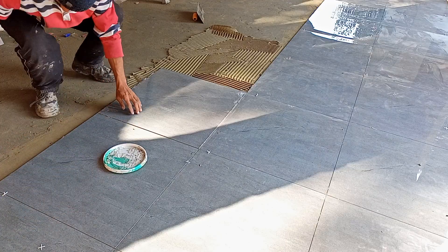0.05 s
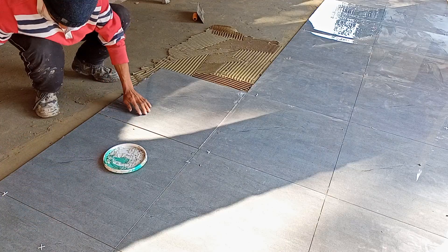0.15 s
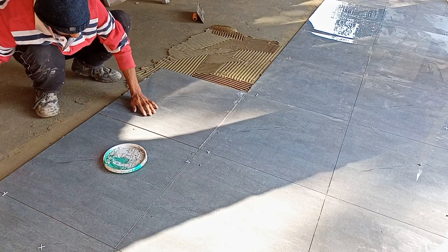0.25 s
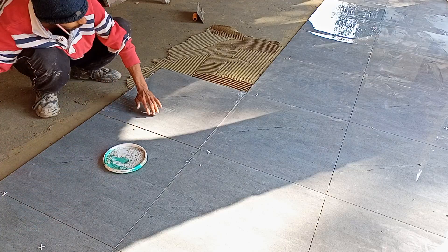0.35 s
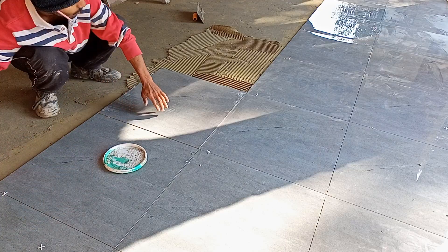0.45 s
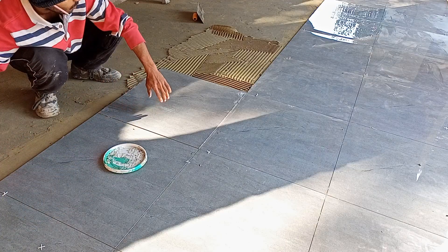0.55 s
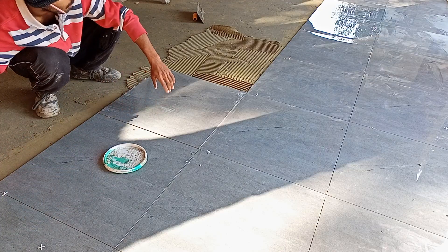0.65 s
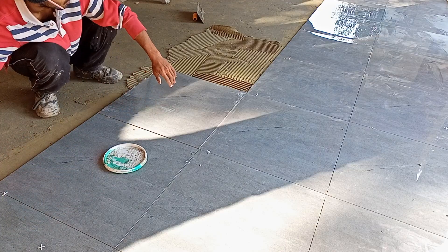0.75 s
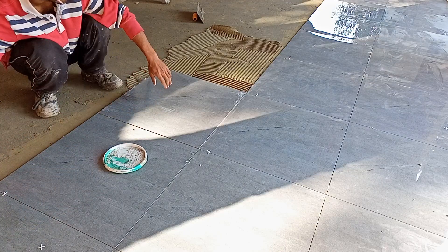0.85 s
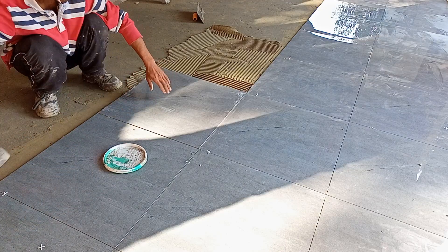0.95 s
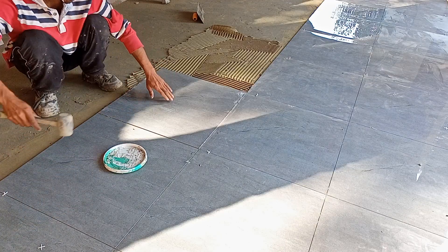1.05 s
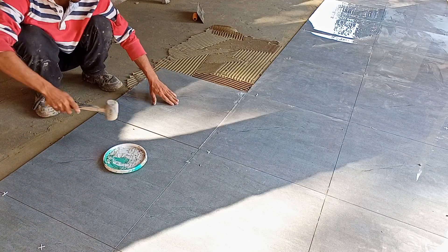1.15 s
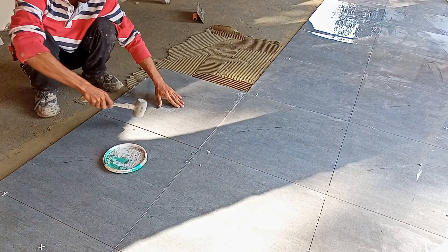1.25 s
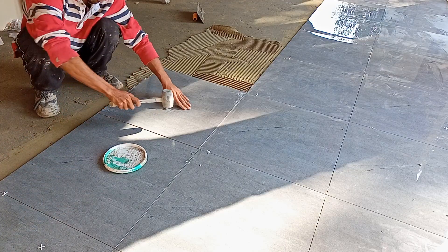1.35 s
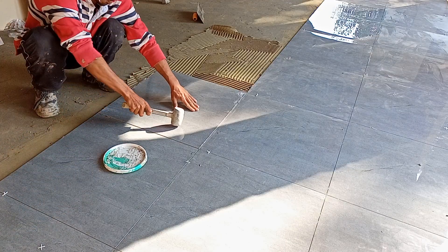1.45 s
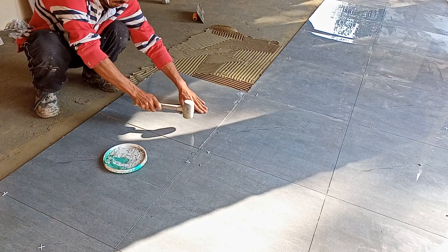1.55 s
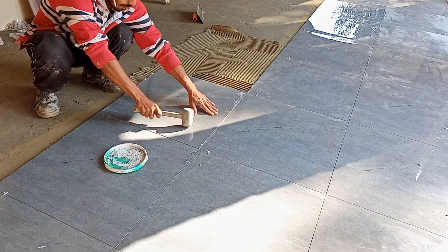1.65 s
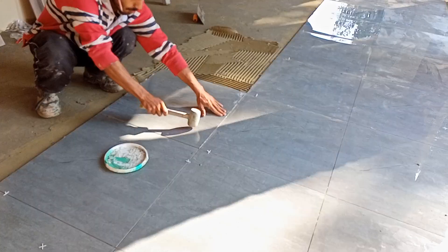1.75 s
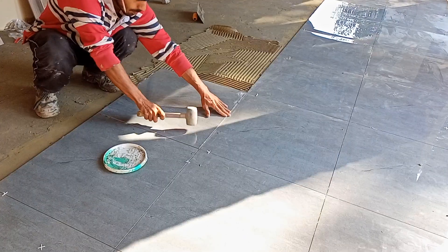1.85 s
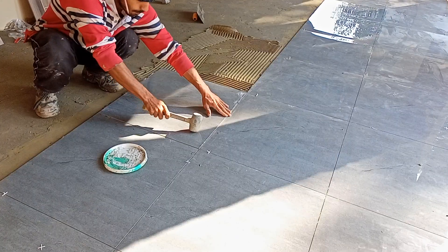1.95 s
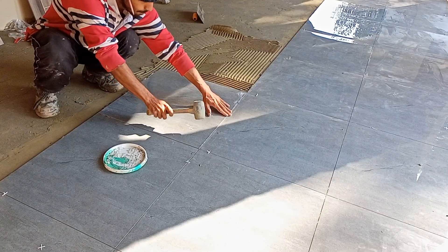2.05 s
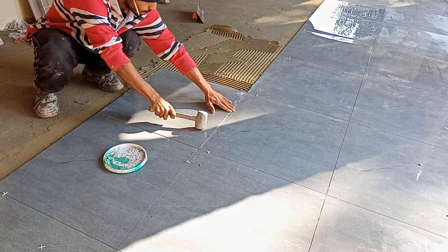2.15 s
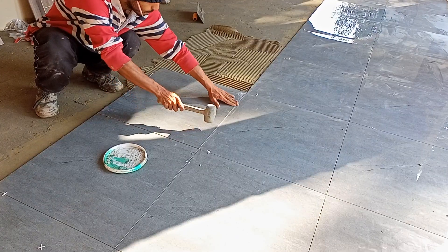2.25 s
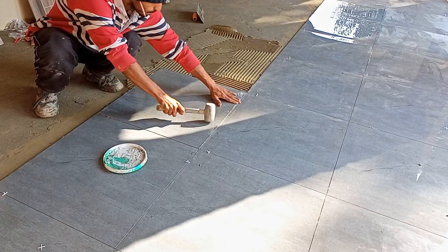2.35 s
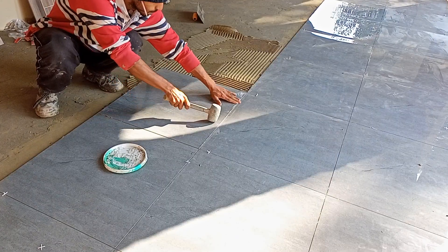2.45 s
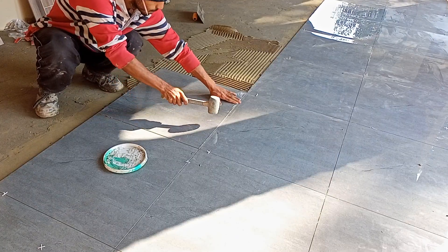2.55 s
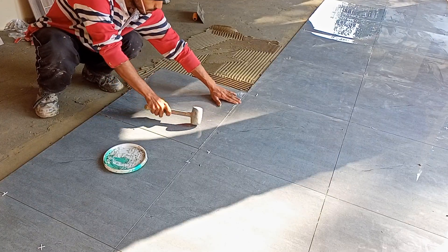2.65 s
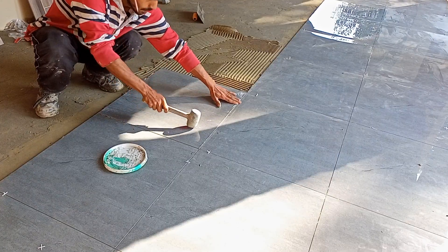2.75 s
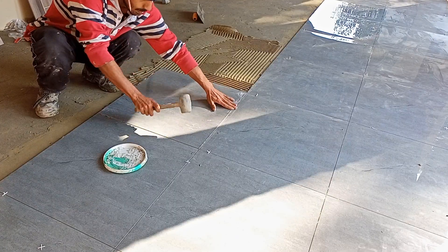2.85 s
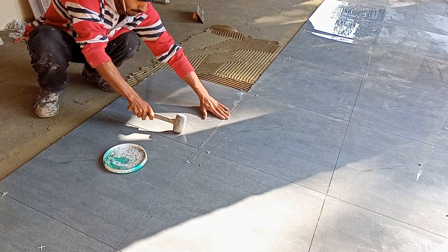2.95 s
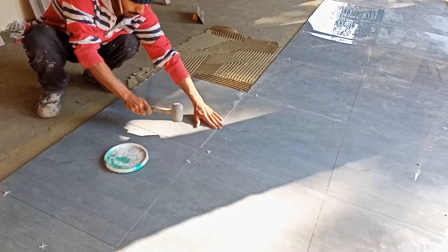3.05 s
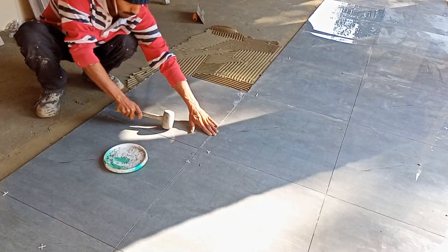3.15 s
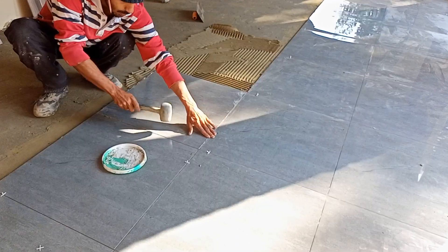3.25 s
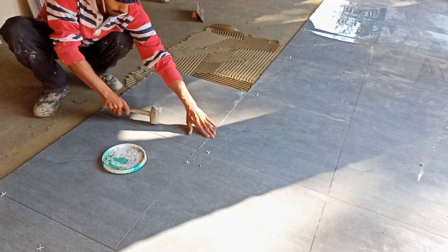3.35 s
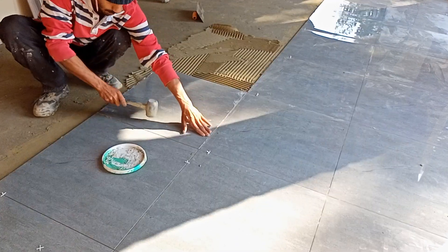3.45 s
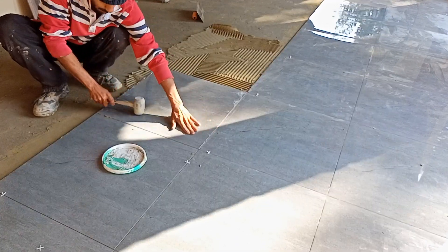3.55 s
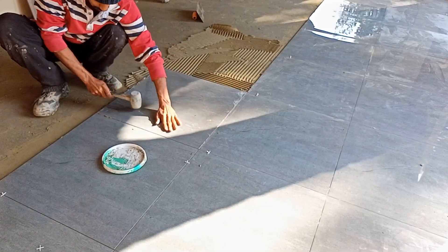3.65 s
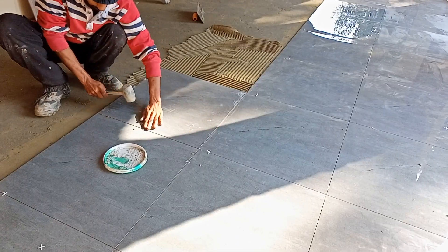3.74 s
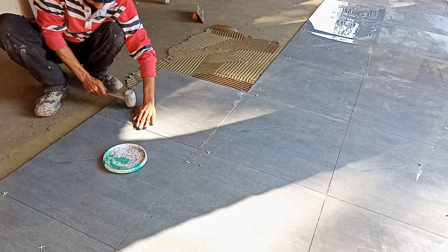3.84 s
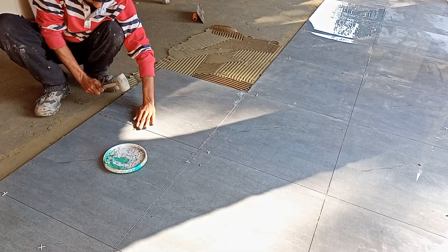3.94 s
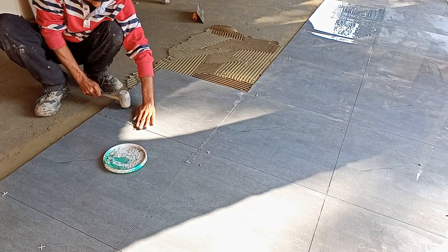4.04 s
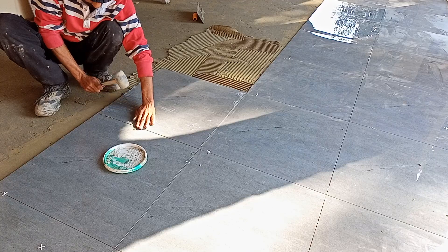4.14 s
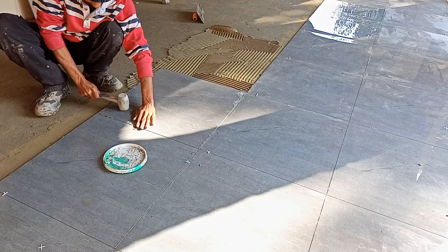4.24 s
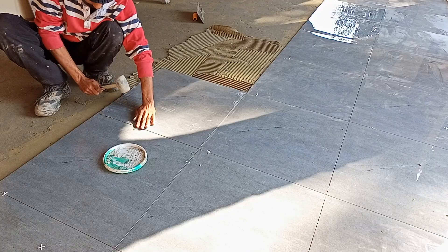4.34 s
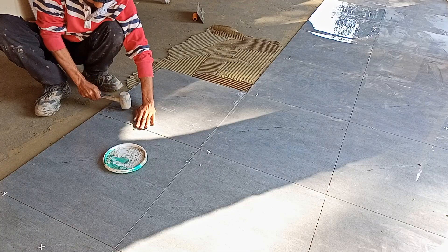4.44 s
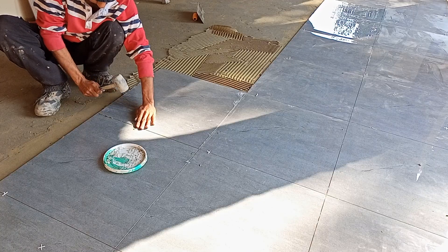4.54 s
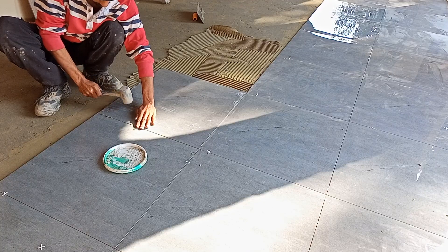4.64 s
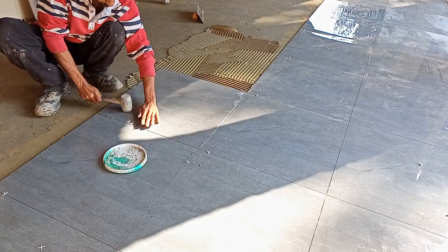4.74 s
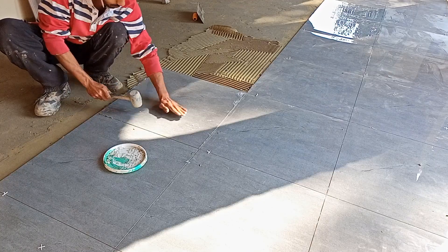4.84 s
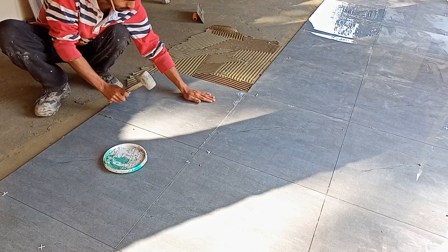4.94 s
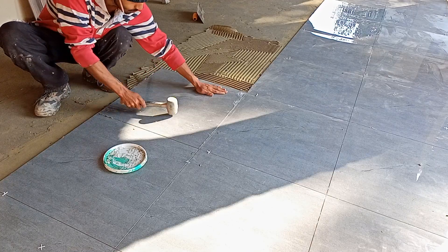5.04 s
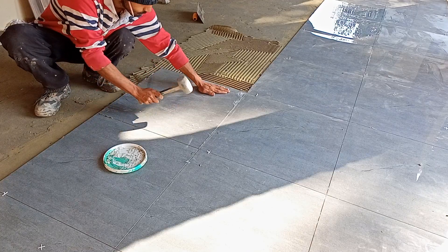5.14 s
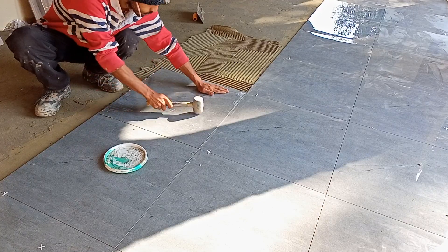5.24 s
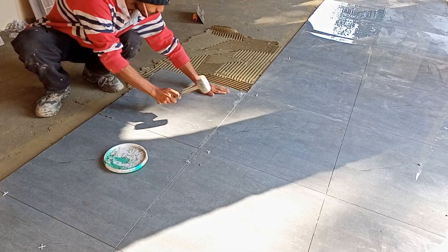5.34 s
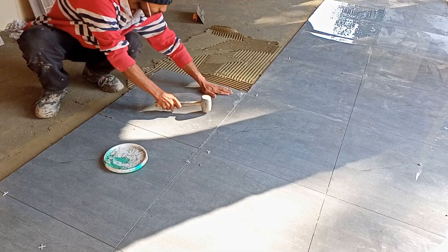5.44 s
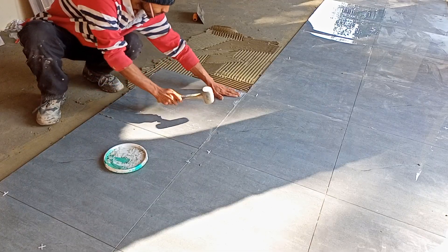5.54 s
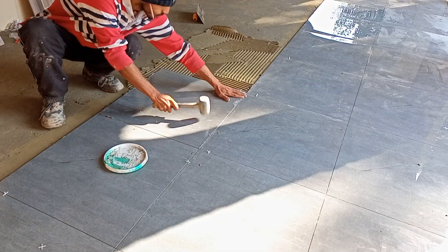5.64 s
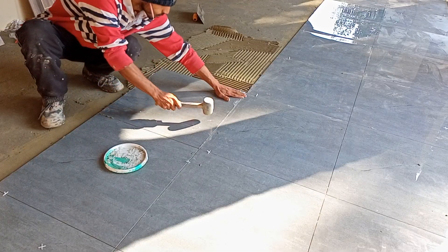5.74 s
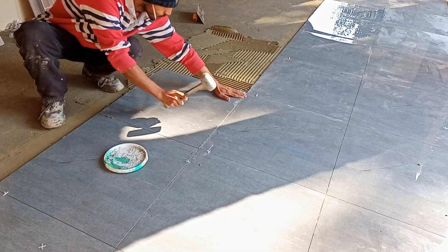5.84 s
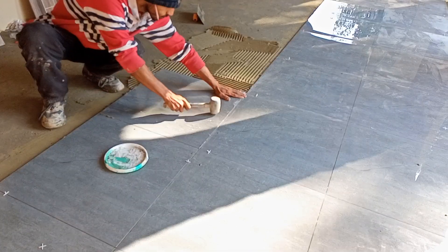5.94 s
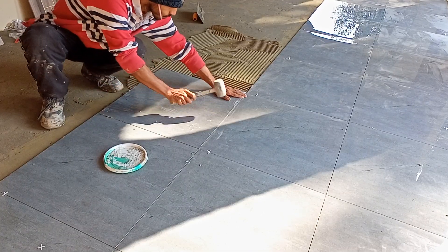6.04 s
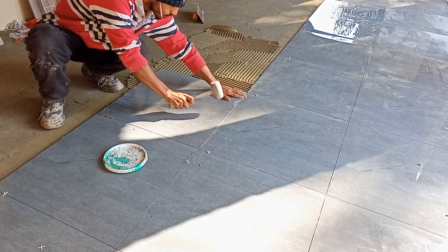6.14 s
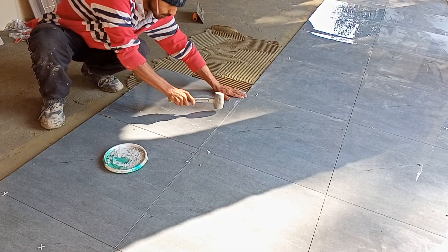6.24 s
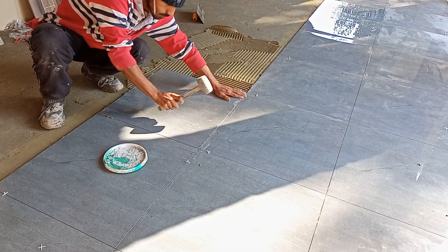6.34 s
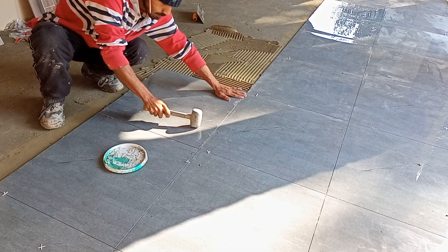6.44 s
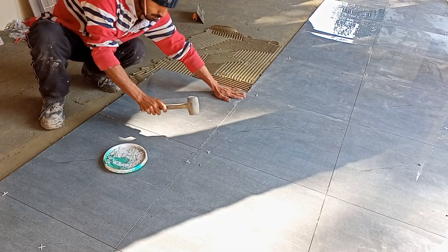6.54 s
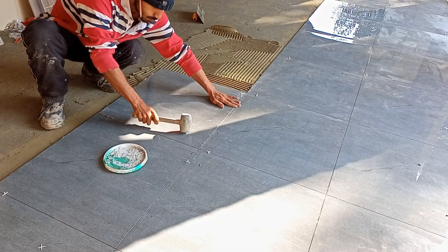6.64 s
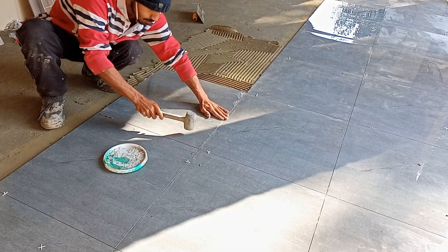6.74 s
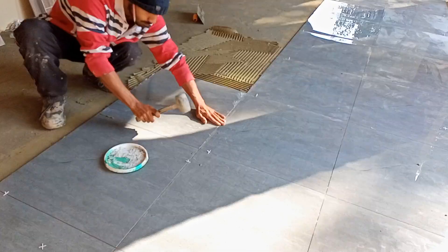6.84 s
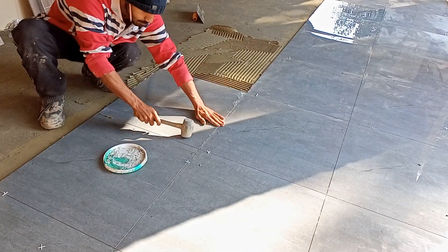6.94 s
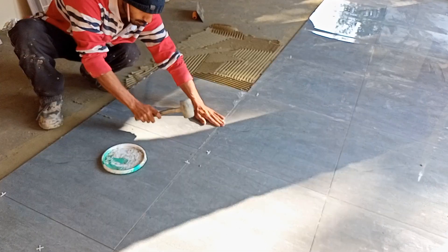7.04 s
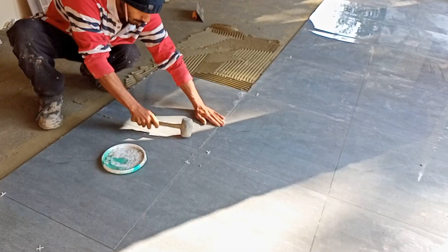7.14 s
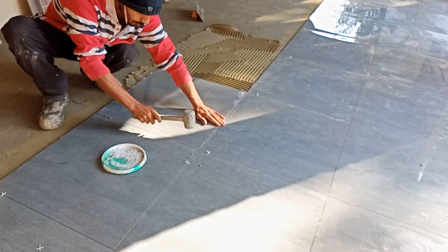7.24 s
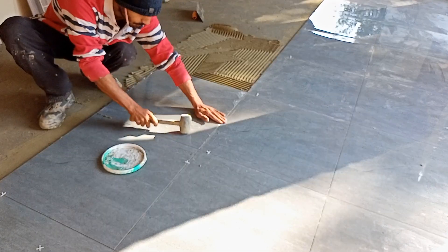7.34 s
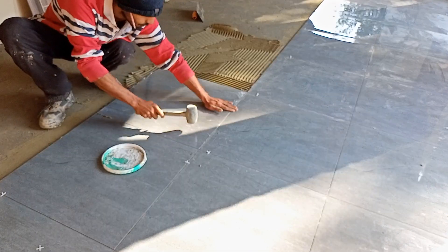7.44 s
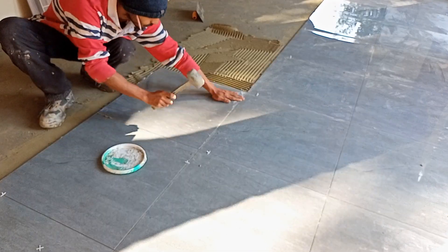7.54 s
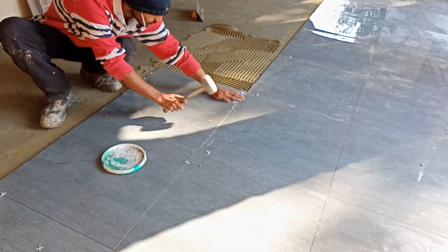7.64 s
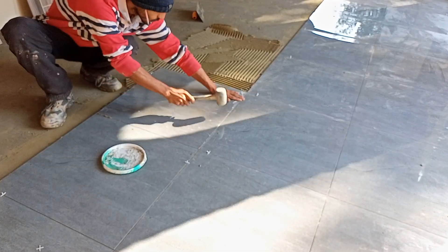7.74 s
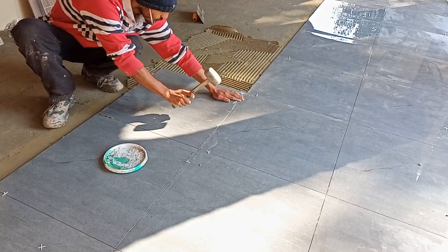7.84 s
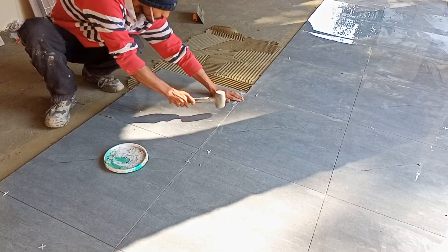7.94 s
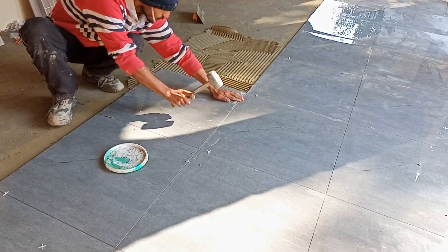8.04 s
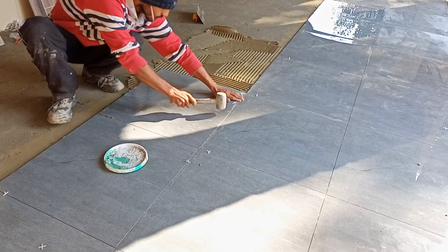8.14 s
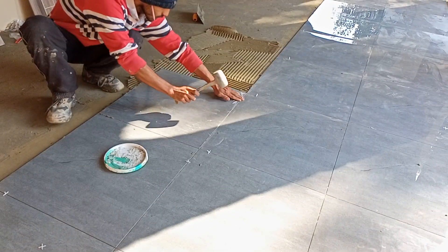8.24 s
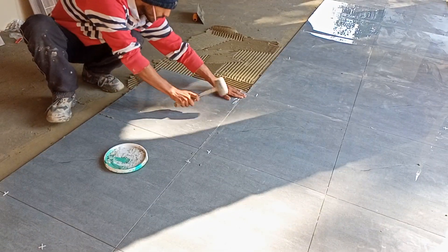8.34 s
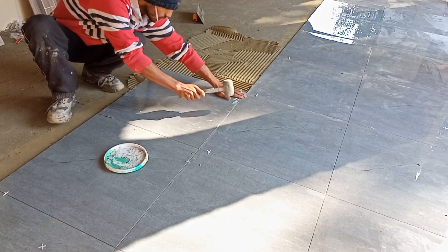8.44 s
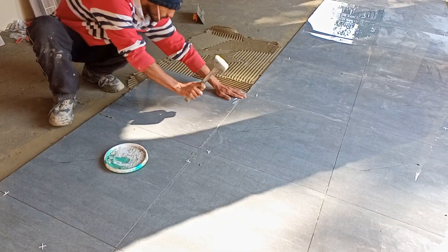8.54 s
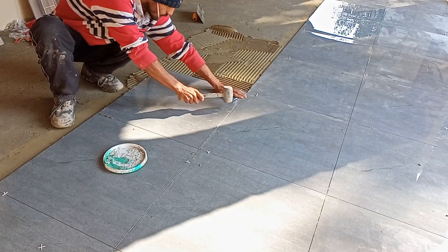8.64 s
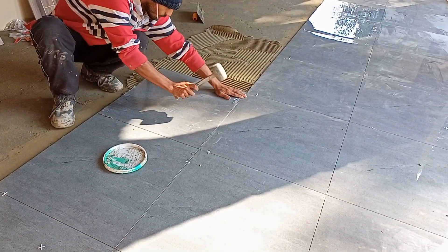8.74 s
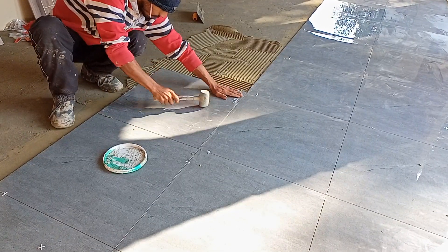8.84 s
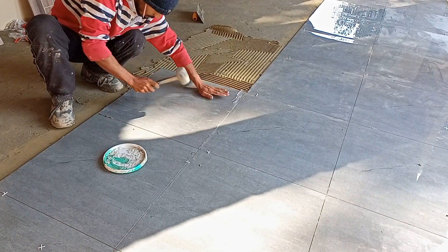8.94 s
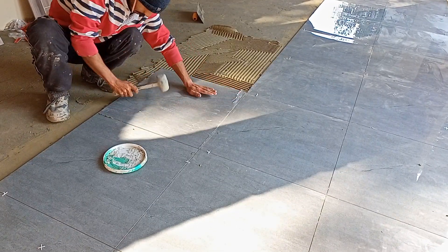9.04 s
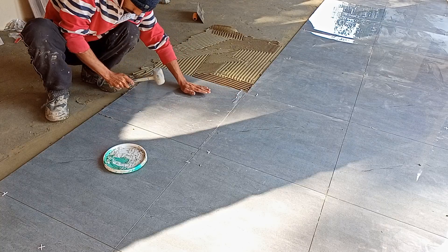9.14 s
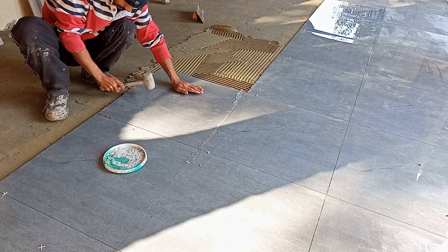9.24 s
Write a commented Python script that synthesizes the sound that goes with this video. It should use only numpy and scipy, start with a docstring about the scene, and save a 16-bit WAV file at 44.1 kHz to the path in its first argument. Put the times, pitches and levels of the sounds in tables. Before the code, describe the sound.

A bare concrete room on a building site, with a barely audible steady rumble. From 0 to 1.3 seconds there are quiet handling sounds: a short gritty scuff at the start, soft finger pats on a tile near 0.2, 0.7 and 1.2, and small dry rubs between them. At 1.55 a rubber mallet begins striking the large tile, about every 0.2 to 0.3 seconds, continuing to the last blow near 9.2. Early blows are low, solid thuds; from about 3.9 to 4.9 they become hollow, woody clacks, slightly faster and stronger. Around 5.1 to 5.5 come forceful blows, then thuds and clacks alternate, softer near 7.4, with hollow knocks again around 7.8 to 8.7. Each has a brief rubbery slap and a half-second room tail. The level is squeezed: sound ducks just before each hit and the reverberation swells back afterward.

```python
"""A bare concrete room on a building site: a tiler pats a large floor tile amid gritty scuffs, then beds
it into its adhesive with quick blows of a rubber mallet. Each blow is a filtered slap plus a knock of
decaying noise through the tile's resonances: bedded spots thud, hollow ones clack. Shaped noise makes the
scuffs, pats, site rumble and room tail. The recorder's limiter ducks just before each blow and lets the
reverberation swell back after it."""
import sys
import numpy as np
from scipy import signal
from scipy.fft import rfft, irfft, next_fast_len
from scipy.io import wavfile
from scipy.ndimage import uniform_filter1d, minimum_filter1d, map_coordinates

SR = 44100
rng = np.random.default_rng(int(sys.argv[2]) if len(sys.argv) > 2 else 0)


def put_to_file(sound):
    """Save the sound as 16-bit audio at rate SR, in the file named by the first command-line argument."""
    columns = np.atleast_2d(sound).T  # one column per channel
    safe = np.clip(columns, -1, 1)
    whole_steps = np.round(safe * 32767)
    wavfile.write(sys.argv[1], SR, whole_steps.astype(np.int16))


N = 409688


def amp(db):
    """Decibels to gain."""
    return 10 ** (np.asarray(db) / 20)


def unit(x):
    """Scale to rms 1."""
    return x / np.sqrt(np.mean(x ** 2) + 1e-20)


def along(points, hz):
    """A (frequency, value) curve read on a log-frequency axis."""
    point_hz, value = np.transpose(points)
    return np.interp(np.log(hz + 1), np.log(point_hz + 1), value)


def at(curve, s):
    """A (time, value) curve read at time s."""
    return np.interp(s, *np.transpose(curve))


def filtered(x, response):
    """Filter x by a response given as a function of frequency."""
    size = next_fast_len(len(x) + 8192)  # padding keeps the end from wrapping onto the start
    hz = np.fft.rfftfreq(size, 1 / SR)
    return irfft(rfft(x, size) * response(hz), size)[:len(x)]


def add(track, s, sound):
    """Mix a sound into the track from time s on."""
    part = track[max(round(s * SR), 0):][:len(sound)]
    part += sound[:len(part)]


# distant site noise: pitch_hz, level_db (spectrum per Hz, relative)
SITE_SPECTRUM = [(25, -18), (50, -12), (80, 7), (115, -3), (250, -6), (600, -17), (1200, -22),
                 (3000, -16.5), (5500, -31), (16000, -28.5)]


def site(level_db=-56):
    """The faint steady rumble of the building site: noise weighted by frequency."""
    noise = rng.standard_normal(N)
    return amp(level_db) * unit(filtered(noise, lambda hz: amp(along(SITE_SPECTRUM, hz))))


def friction(colour, grain_db=4, grain_s=.003):
    """Coloured noise of rms 1, in clumps as sand grains catch and slip."""
    clumps = unit(uniform_filter1d(rng.standard_normal(N), round(grain_s * SR)))
    grains = rng.standard_normal(N) * amp(grain_db * clumps)
    return unit(filtered(grains, lambda hz: amp(along(colour, hz))))


# reverberation time, the fall by 60 dB: pitch_hz, decay_s
ROOM_DECAY = [(100, 0.93), (300, 0.61), (1000, 0.58), (2000, 0.57), (4000, 0.47), (8000, 0.38),
              (15000, 0.27)]
# colour of the reverberation: pitch_hz, level_db
ROOM_COLOUR = [(100, -5), (400, 4), (1500, 2.5), (4000, -6), (8000, -6), (15000, -3)]


def room_tail(build_s=0.0028):
    """One second of diffuse reverberation, energy 1: noise whose treble dies first."""
    hz, t, bands = signal.stft(rng.standard_normal(SR), SR, nperseg=256)
    colour_db = along(ROOM_COLOUR, hz)[:, None]
    decay_db = -60 * t / along(ROOM_DECAY, hz)[:, None]
    tail = signal.istft(bands * amp(colour_db + decay_db), SR, nperseg=256)[1][:SR]
    tail = tail * (1 - np.exp(-np.arange(SR) / SR / build_s))
    return tail / np.linalg.norm(tail)


# hand, shoes and mallet rubbing on gritty surfaces: start_s, rise_s, length_s, grit_db, body_db
SCUFF_STROKES = [(-.05, .03, 0.08, -51, -48.5), (0.049, 0.011, 0.055, -31.5, -38),
                 (0.304, 0.018, 0.11, -53.5, -55.5), (0.425, 0.012, 0.11, -48, -57.5),
                 (0.86, 0.021, 0.049, -49.5, -40), (0.955, 0.023, 0.073, -50.5, -54)]
# fingers touch the tile: start_s, level_db
FINGER_PATS = [(.187, -31.5), (0.691, -37), (1.197, -42)]
# bright gritty part of a scuff: pitch_hz, level_db (spectrum per Hz, relative)
GRIT_SPECTRUM = [(300, 1), (900, -15.5), (1700, -1.5), (3200, -3), (4500, -11), (6000, -20.5),
                 (9000, -16.5), (16000, -22)]
# dull body of a scuff: pitch_hz, level_db (spectrum per Hz, relative)
RUB_SPECTRUM = [(60, -7), (170, -7), (500, 2), (850, -1.5), (1400, -9.5), (4000, -28.5)]
# fingers on the tile: pitch_hz, level_db (spectrum per Hz, relative)
FINGER_SPECTRUM = [(200, -2), (800, -8), (1700, -0.5), (3000, -3.5), (4200, -16), (6000, -19), (16000, -42)]


def handling(release_s=0.024, pat_rise_s=0.0032, pat_s=0.022, dry_db=-5, wet_db=-8):
    """Enveloped friction noise: scuffs with a gritty and a dull part, soft finger pats, and the room's answer."""
    t, out = np.arange(N) / SR, np.zeros(N)
    grit, rub, finger = friction(GRIT_SPECTRUM), friction(RUB_SPECTRUM), friction(FINGER_SPECTRUM)
    for s, rise, length, grit_db, body_db in SCUFF_STROKES:
        attack = np.clip((t - s) / rise, 0, 1)
        release = np.exp(-np.clip((t - s - rise - length) / release_s, 0, 20))
        out += attack * release * (amp(grit_db) * grit + amp(body_db) * rub)
    for s, db in FINGER_PATS:
        pat = np.clip((t - s) / pat_rise_s, 0, 1) * np.exp(-np.abs(t - s) / pat_s)
        out += amp(db) * pat * finger
    return amp(dry_db) * out + amp(wet_db) * signal.fftconvolve(out, room_tail())[:N]


def causal(gain):
    """The minimum-phase response that has this gain on an FFT grid, so that nothing rings before the hit."""
    cepstrum = irfft(np.log(np.maximum(gain, 1e-6)))
    half = len(cepstrum) // 2
    # fold the cepstrum onto positive times
    cepstrum[1:half] *= 2
    cepstrum[half + 1:] = 0
    return np.exp(rfft(cepstrum))


def resonances(hz, ring):
    """Peaks and notches in dB; a narrow peak rings long."""
    return sum(db / (1 + (2 * (hz - centre) / width) ** 2) for centre, width, db in ring)


def struck(excitation, colour):
    """An excitation's spectrum played through a colour, energy 1."""
    sound = irfft(excitation * colour)
    return sound / np.linalg.norm(sound)


# echoes of the nearest walls and the ceiling: delay_s, level_db
EARLY_ECHOES = [(.0054, -31.5), (.008, -9.5), (.0096, -16.5), (.014, -15.5), (.022, -21), (0.025, -17),
                (.034, -9.5), (0.036, -17.5)]


def near_paths(loss_db_per_s, wander_s=.0003):
    """The direct sound and its first reflections, weaker on long paths, shifting with the struck spot."""
    paths = np.zeros(SR)
    paths[0] = 1
    for s, db in EARLY_ECHOES:
        add(paths, s + wander_s * rng.standard_normal(), amp([db - loss_db_per_s * s]))
    return paths


def contact(flex_db=5, flex_t60_s=0.019, flex_hz=2600, rubber_hz=4500):
    """One push, rounded by the rubber, with bending waves that cross the tile and die in the adhesive."""
    flex = rng.standard_normal(SR) * amp(-60 * np.arange(SR) / SR / flex_t60_s)
    flex = flex / np.linalg.norm(flex)
    push = amp(flex_db) * signal.lfilter(*signal.butter(2, flex_hz, fs=SR), flex)
    push[0] += 1
    return signal.lfilter(*signal.butter(2, rubber_hz, fs=SR), push)


# how adhesive colours a blow: pitch_hz, level_db
THUD_COLOUR = [(220, 8), (580, -0.5), (1150, -4), (1750, -3), (2150, 2), (3600, 1.5)]
# how a void colours a blow: pitch_hz, level_db
CLACK_COLOUR = [(220, -4.5), (580, 0.3), (1150, 6), (1750, 3.5), (2150, 2.5), (3600, 1.6)]
# peaks and notches that a void adds: pitch_hz, width_hz, level_db
VOID_MODES = [(1588, 96, 1.5), (1760, 57, 5), (2862, 220, -3)]
# share of the crispness that the tile takes up: pitch_hz, share (no unit)
CRISP_UPTAKE = [(1750, 0), (2200, 0.34), (3600, 0.28), (8000, 0.81)]
# the snap dulls as the tile sinks in: pitch_hz, change_db_per_s
SETTLING_DRIFT = [(1750, -0.5), (2300, -0.8), (4500, -0.48), (8000, -0.5)]
HALF_SET_S = 3.74  # the tile is half bedded by then; the settling colour is neutral here


def spot(hz, s, crisp_db, hollow):
    """Colour of one blow in dB: adhesive favours the thud, a void the clack, a flat landing the treble."""
    void = along(CLACK_COLOUR, hz) + resonances(hz, VOID_MODES)
    support = (1 - hollow) * along(THUD_COLOUR, hz) + hollow * void
    crispness = crisp_db * along(CRISP_UPTAKE, hz)
    settling = (s - HALF_SET_S) * along(SETTLING_DRIFT, hz)
    return support + crispness + settling


def uneven(hz, depth_db=2.5, spacing_hz=260, from_hz=2000):
    """Each spot wakes the tile's upper modes in its own proportions: a smooth random curve in dB."""
    knots = rng.standard_normal(len(hz) // 100)
    curve = map_coordinates(knots, [hz / spacing_hz], mode="mirror")
    return depth_db * curve * np.clip(hz / from_hz, 0, 1) ** 2


# mallet blows: start_s, force_db, crispness_db (how flat the rubber face lands)
MALLET_BLOWS = [(1.555, 0.5, -2.5), (1.7587, 4.5, -3), (1.9757, 3.5, 2), (2.2081, 2.5, 2), (2.4685, 4.5, 0),
                (2.7619, 2.5, -2.5), (3.0035, 2.5, 0.5), (3.225, 4.5, -2.5), (3.4426, 3, 2),
                (3.6502, 3.5, -3.5), (3.8861, 4.5, -5.5), (4.1208, 6.5, -0.5), (4.3488, 5.5, 8),
                (4.5337, 4, 5.5), (4.7035, 6, 1), (4.851, 8, 4), (5.132, 6, 2), (5.3397, 9, -1.5),
                (5.5354, 9.5, 3.5), (5.7594, 5, 0), (6.0338, 4, 5.5), (6.268, 1, -1.5), (6.5092, 3, 1),
                (6.7345, 1, 4), (6.9865, 1, 1), (7.2173, -1, -2), (7.4485, -3, 6.5), (7.786, 0, 8),
                (8.003, 4, 1), (8.2031, 3.5, 2), (8.474, 0, -5.5), (8.722, 1, 2), (8.942, 5.5, -0.5),
                (9.1666, 6, -8)]
# the mallet works its way over the tile: time_s, hollowness (0 fully bedded, 1 over a void)
HOLLOWNESS = [(1.555, .05), (1.76, 0.14), (2.2, 0.25), (2.76, 0.098), (3.44, 0), (3.65, 0.035), (3.89, 0.7),
              (4.12, 0.85), (4.85, 0.83), (5.13, 0.36), (6.03, 0.65), (6.51, 0.13), (7.0, 0.39),
              (7.45, 0.22), (7.79, 0.73), (8.47, .6), (8.72, 0.98), (8.94, 0.3)]
# hand and mallet head shade the contact by turns: time_s, slap_db (how much reaches the microphone)
SLAP_SHADING = [(1.5, -0.5), (3.7, 2.5), (4.35, -16), (4.55, -13), (5.1, -1.5), (6, -1), (7, -1.5),
                (8.2, 6.5), (9.2, 3)]
# broad colour of a blow on an average spot: pitch_hz, level_db (spectrum per Hz, relative)
TILE_SPECTRUM = [(40, -50), (95, -27), (200, -5), (310, 0.5), (600, -3.5), (850, -6), (1300, -10),
                 (1750, -11), (2000, -14.5), (3000, -21), (4000, -23), (5500, -36), (9000, -39.5),
                 (16000, -46)]
# resonances (+) and antiresonances (-) of the tile and the floor under it: pitch_hz, width_hz, level_db
TILE_MODES = [(153.6, 19.5, 6.5), (181.7, 37.6, -10), (216, 7.7, 0.5), (270.9, 5.9, 5), (287.5, 27.2, -8.5),
              (302.4, 18.3, 8.5), (356.5, 6.2, -9), (418, 16, 3), (474, 29, -1.5), (536.5, 22, 5),
              (623, 38, 3), (720, 37, 0.5), (896, 13, -2), (1050, 41, 6), (1067, 63, -7), (1231, 79, 4.5),
              (1435, 37, 1.5), (1536, 120, -1.5), (1672, 16.4, 8.5), (1716, 58, 5), (1880, 117, -3),
              (2060, 40, 3), (2330, 25, -2.5), (2630, 43, 1), (3275, 200, 3.5), (3800, 35, 4)]
# the slap of rubber on glaze: pitch_hz, level_db (spectrum per Hz, relative)
SLAP_SPECTRUM = [(500, -26), (2500, -1), (5500, -4.5), (9000, -2), (16000, -5)]


def mallet(knock_db=19, hollow_knock_db=2, room_db=23.0, slap_db=-11.0, slap_loss_db_per_s=200, alike=0.67):
    """Each blow is a slap, the tile's knock and the room's answer, coloured by the spot that it lands on."""
    track, hz = np.zeros(N), np.fft.rfftfreq(SR, 1 / SR)
    body_db = along(TILE_SPECTRUM, hz) + resonances(hz, TILE_MODES)
    glaze = causal(amp(along(SLAP_SPECTRUM, hz)))
    tail = room_tail()
    for s, force_db, crisp_db in MALLET_BLOWS:
        hollow = np.clip(at(HOLLOWNESS, s), 0, 1)
        colour = causal(amp(body_db + spot(hz, s, crisp_db, hollow) + uneven(hz)))

        slap_gain = -amp(slap_db + crisp_db + at(SLAP_SHADING, s))  # inverted polarity
        slap = slap_gain * struck(rfft(near_paths(slap_loss_db_per_s)), glaze)

        knock_gain = amp(knock_db + hollow_knock_db * hollow)
        knock = knock_gain * struck(rfft(contact()) * rfft(near_paths(0)), colour)

        # neighbouring spots wake nearly the same room modes
        tail = alike * tail + np.sqrt(1 - alike ** 2) * room_tail()
        room = amp(room_db) * struck(rfft(tail), colour)
        add(track, s, amp(force_db) * (slap + knock + room))
    return track


def limiter(x, ceiling_db=-5.5, sense_s=0.0021, ahead_s=0.033, glide_s=0.019, hold_s=0.097, release_db_per_s=105):
    """The gain glides down ahead of a loud sound, holds, then climbs back."""
    power = np.abs(uniform_filter1d(x ** 2, round(sense_s * SR)))
    need_db = np.minimum(ceiling_db - 10 * np.log10(power + 1e-12), 0)
    ahead, glide, hold = round(ahead_s * SR), round(glide_s * SR), round(hold_s * SR)
    held_db = minimum_filter1d(need_db, ahead + hold, origin=(hold - ahead) // 2)
    # a running minimum against a ramp limits how fast the gain may climb
    climb_db = release_db_per_s * np.arange(N) / SR
    gain_db = np.minimum.accumulate(held_db - climb_db) + climb_db
    return x * uniform_filter1d(amp(gain_db), glide, origin=(glide - 1) // 2)


def scene():
    """Everything that reaches the microphone."""
    return (site() + handling() + mallet())[None]


# microphone colour: pitch_hz, level_db
MIC_COLOUR = [(5000, 2), (6800, -1), (8300, 7), (9800, -5.5), (12000, -10), (14300, 0), (15700, -3),
              (16500, -16)]
TOP_HZ = 16900  # nothing is kept above this


def record(dry, top=1.0, hardness=8, low_hz=50):
    """Microphone colour, limiter, rounded peaks, low cut and the band limit."""
    x = filtered(dry[0], lambda hz: amp(along(MIC_COLOUR, hz)))
    x = limiter(x)
    x = x / (1 + np.abs(x / top) ** hardness) ** (1 / hardness)
    x = signal.sosfilt(signal.butter(2, low_hz, "high", fs=SR, output="sos"), x)
    return filtered(x, lambda hz: hz < TOP_HZ)[None]


dry = scene()
out = record(dry)
put_to_file(out)
```